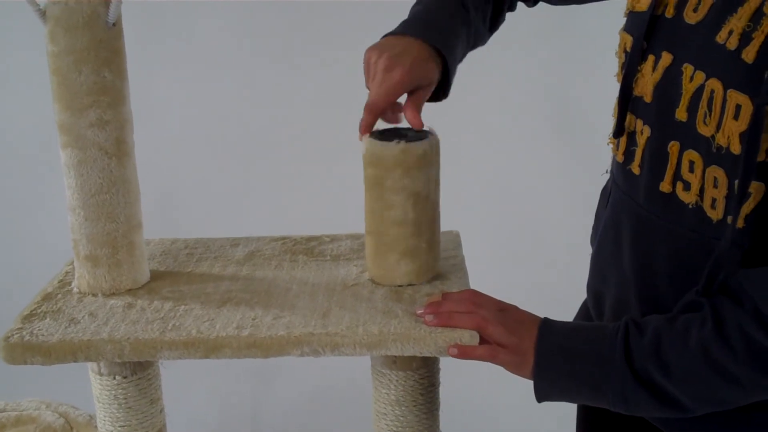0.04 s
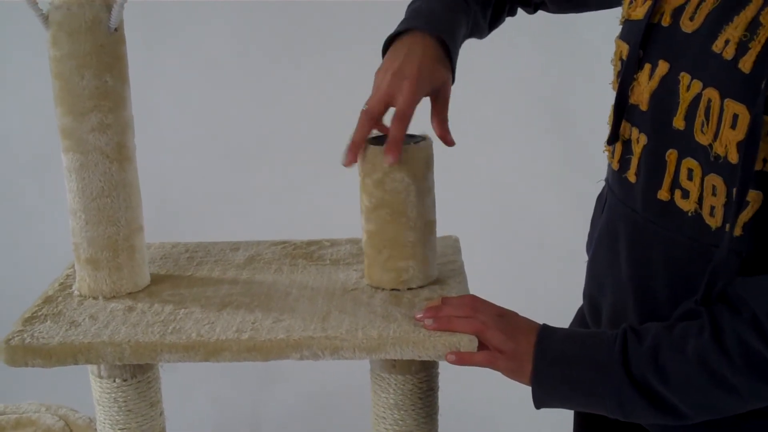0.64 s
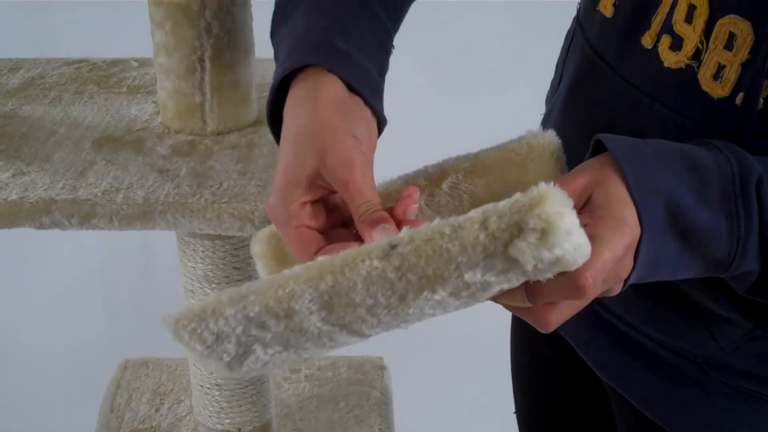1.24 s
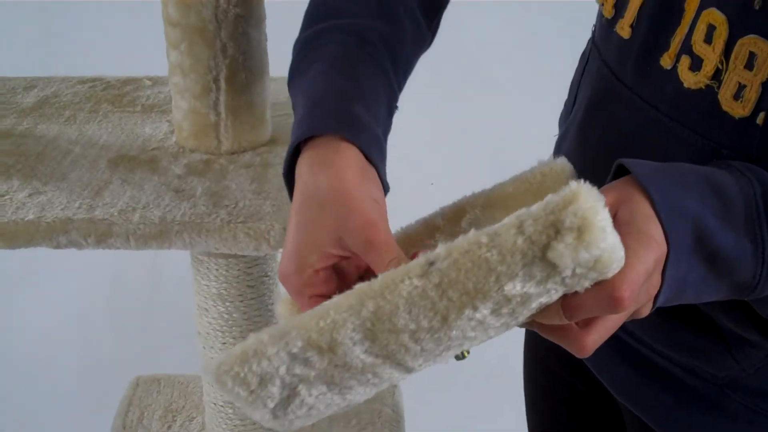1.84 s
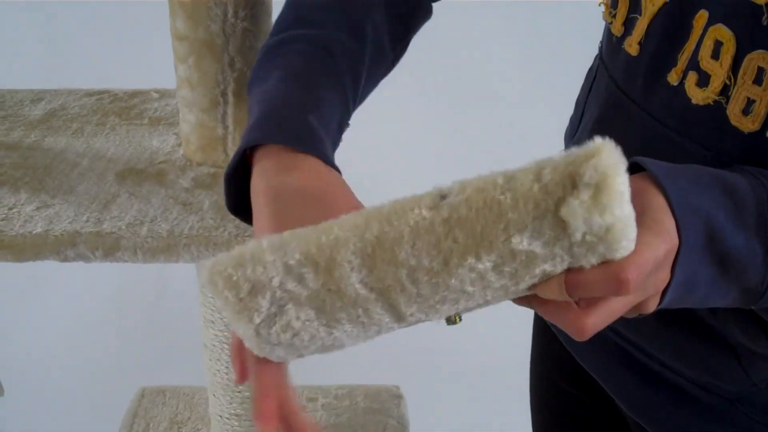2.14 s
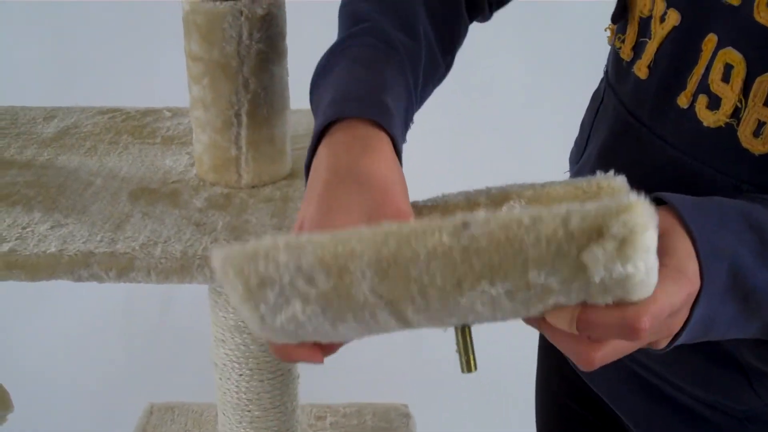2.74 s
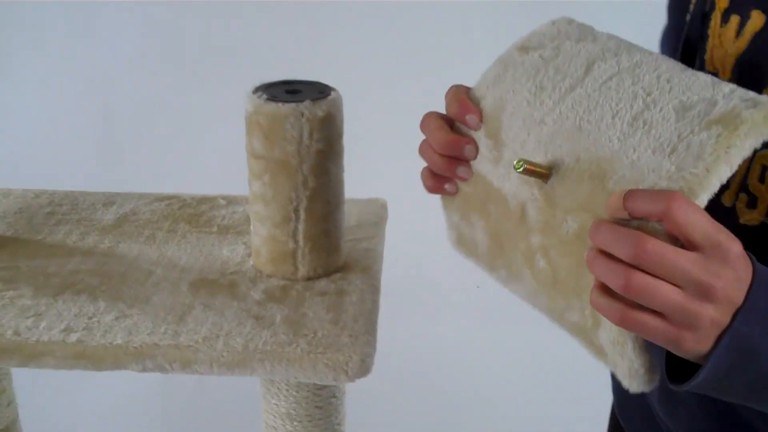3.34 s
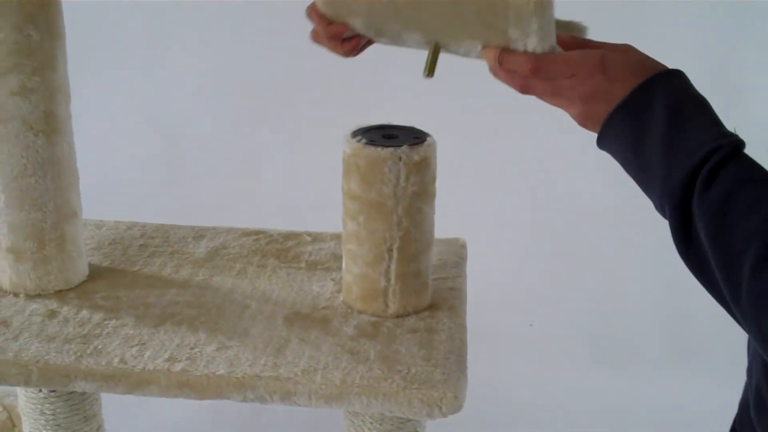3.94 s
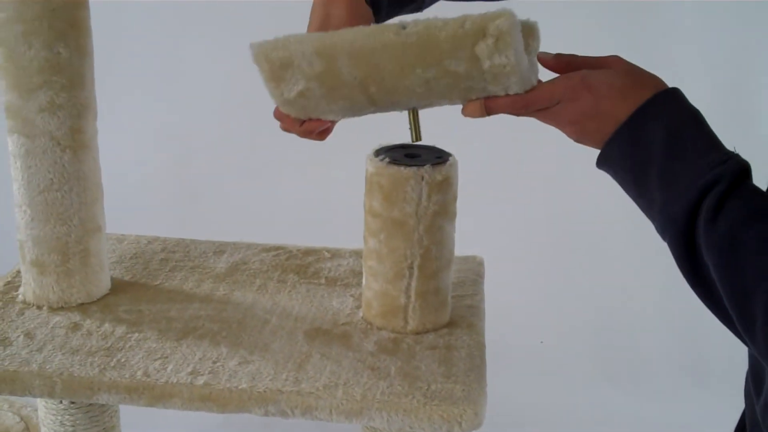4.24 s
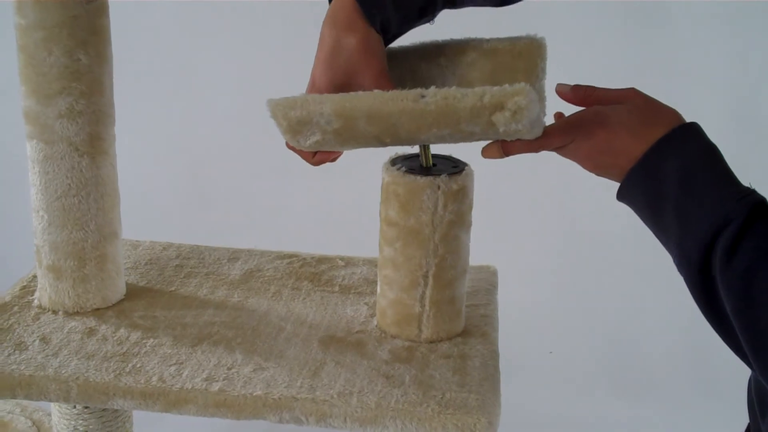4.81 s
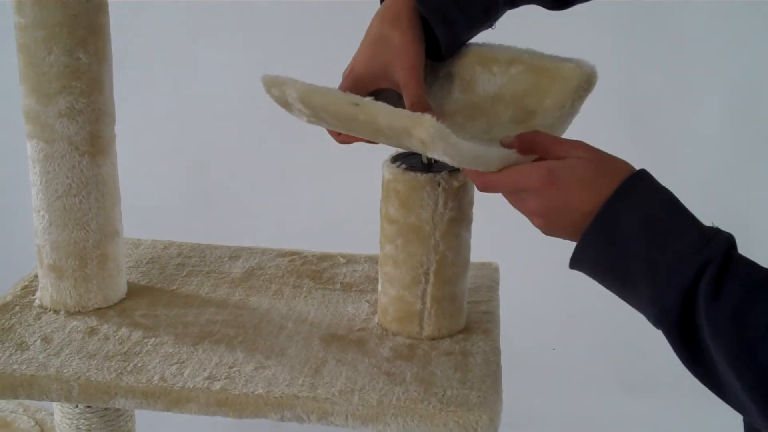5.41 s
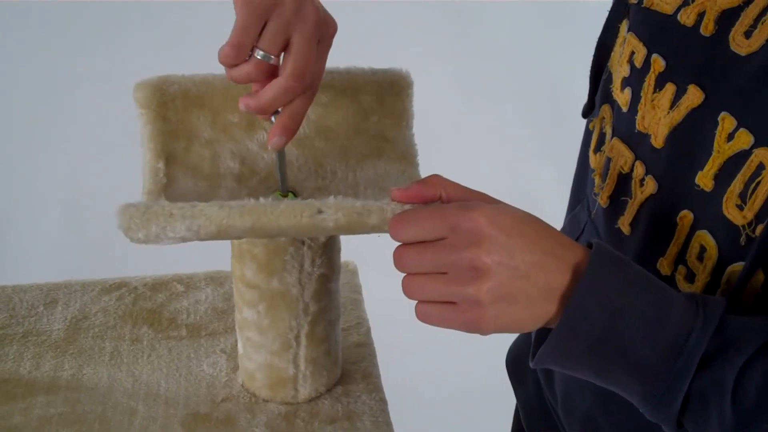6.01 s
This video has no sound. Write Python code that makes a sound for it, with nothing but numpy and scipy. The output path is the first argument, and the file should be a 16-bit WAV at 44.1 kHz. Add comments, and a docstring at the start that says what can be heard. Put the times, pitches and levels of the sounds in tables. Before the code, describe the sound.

Close to a hissy microphone in a bare, slightly echoing room, someone assembles a cat tree. Dull rubbing and small bumps come first as a post turns. Faint ticks and short scrapes of a bolt's thread lead to the loudest sound, a quick rasp and thump as it goes home. Faint rustling follows, then a cluster of light knocks as the perch seats, and one crisp metal tap.

```python
"""Assembling a carpeted cat tree.

A bare room, with the work close to a hissy camera microphone. A post is twisted tight on its platform,
rubbing and knocking. After a brief dropout a steel bolt is pushed through a perch board, its thread
rasping in the hole until the head thumps home. The bolt bumps over the post's cap and slides in,
the perch drops into place, and a steel key knocks on the bolt's head."""
import sys
import numpy as np
from scipy import signal
from scipy.fft import rfft, irfft
from scipy.io import wavfile
from scipy.ndimage import uniform_filter1d

SR = 44100
rng = np.random.default_rng(int(sys.argv[2]) if len(sys.argv) > 2 else 0)


def persist_wave(psi):
    """Save psi, clipped to +-1, as 16-bit WAV."""
    counts = np.round(np.clip(psi, -1, 1) * 32767).astype(np.int16)
    wavfile.write(sys.argv[1], SR, np.atleast_2d(counts).T)


N = 267588
TIME = np.arange(N) / SR
DROPOUT_START_S, DROPOUT_END_S = 0.692, 0.715

# Resonances of the post and of the seated perch. Each row: frequency in Hz, level in dB, t60 in seconds.
POST_MODES = [(145, -19, 0.15), (207, -7.5, 0.11), (303, -1, 0.04), (394, -1.5, 0.054), (499, -2, 0.065),
              (596, -1.5, 0.07), (680, -2.5, 0.056), (883, -1.5, 0.028), (1183, -3.5, 0.027),
              (1660, -0.5, 0.0094), (2033, 3, 0.024), (2400, -9, 0.015), (3800, 0, 0.011)]
PERCH_MODES = [(366, -6, 0.048), (536, 0.5, 0.049), (687, 4.5, 0.022), (870, 3, 0.019), (1063, -1.5, 0.051),
               (1195, 5, 0.013), (1434, 2.5, 0.015), (1670, -1.5, 0.022), (1970, 2.5, 0.018),
               (2135, 0, 0.021), (2465, 0, 0.021), (3240, -5.5, .011), (4040, 2.5, 0.024),
               (4510, -1, 0.027), (5600, -20, 0.0076)]


def gain_of(db):
    """Decibels to amplitude."""
    return 10 ** (np.asarray(db) / 20)


def unit_rms(x):
    """Scales to rms 1."""
    return x / np.sqrt(np.mean(x ** 2) + 1e-20)


def curve_at(points, hz):
    """Reads a table on a log-frequency axis."""
    point_hz, value = np.transpose(points)
    return np.interp(np.log(hz + 1), np.log(point_hz + 1), value)


def add(mix, start_s, sound):
    """Mixes a sound in at its start time."""
    part = mix[max(round(start_s * SR), 0):][:len(sound)]
    part += sound[:len(part)]


def coloured(x, spectrum, share=1):
    """Filters by a table of dB, or by a share of it."""
    size = x.shape[-1]
    gain = gain_of(share * curve_at(spectrum, np.fft.rfftfreq(size, 1 / SR)))
    return irfft(rfft(x) * gain, size)


def peaked(x, peaks):
    """Lifts a few broad resonances."""
    hz = np.fft.rfftfreq(len(x), 1 / SR)
    lift_db = sum(db * np.exp(-((hz - centre) / width) ** 2) for centre, width, db in peaks)
    return irfft(rfft(x) * gain_of(lift_db), len(x))


def leaned_left(pair, balance):
    """Raises the left channel and lowers the right, each by a share of the balance curve."""
    return np.array([coloured(pair[0], balance, 0.71), coloured(pair[1], balance, -0.58)])


def stereo_noise(size, likeness):
    """White noise whose two channels are partly alike, band by band."""
    same = np.clip(curve_at(likeness, np.fft.rfftfreq(size, 1 / SR)), -1, 1)
    left, independent = rfft(rng.standard_normal((2, size)))
    right = same * left + np.sqrt(1 - same ** 2) * independent
    return irfft(np.array([left, right]), size)


def ring(modes, size):
    """Damped modes; neighbours swing in opposite directions."""
    t = np.arange(size) / SR
    return sum((-1) ** k * gain_of(db) * np.exp(-np.log(1000) * t / t60) * np.sin(2 * np.pi * hz * t)
               for k, (hz, db, t60) in enumerate(modes))


def efforts(rows, attack_s, fade_db_per_s, release_s):
    """Each movement takes hold, fades or swells steadily while it lasts, and lets go."""
    out = np.zeros(N)
    for start, length, db in rows:
        t = np.maximum(TIME - start, 0)
        attack = np.minimum(t / attack_s, 1)
        hold = gain_of(db - fade_db_per_s * np.minimum(t, length))
        release = np.exp(-np.maximum(t - length, 0) / release_s)
        out += attack * hold * release
    return out


def swells(rows):
    """Short movements that swell and fade evenly."""
    power = np.zeros(N)
    for middle_s, db, half_s in rows:
        near = abs(TIME - middle_s) < 4 * half_s
        power[near] += gain_of(db) ** 2 * np.exp(-((TIME[near] - middle_s) / half_s) ** 2)
    return np.sqrt(power)


def grains(per_s, spread_db):
    """Tiny stick-slip clicks of uneven size."""
    size = gain_of(spread_db * np.minimum(rng.exponential(1, N), 4))
    return unit_rms(rng.standard_normal(N) * size * (rng.random(N) < per_s / SR))


def scratching(effort, spectrum, per_s, spread_db):
    """Dense scratching that follows the effort."""
    return unit_rms(coloured(grains(per_s, spread_db), spectrum)) * effort


def friction(effort, modes, per_s, spread_db, soft_hz):
    """Small slips ring the board, softened by its carpet."""
    body = signal.oaconvolve(grains(per_s, spread_db), ring(modes, size=SR // 5))[:N]
    body = signal.sosfilt(signal.butter(1, soft_hz, fs=SR, output="sos"), body)
    return unit_rms(body) * effort


def tick_and_thud(rows, lag_s, tick_span, thud_band_hz):
    """A knock is two contacts: a hard edge ticks, then the padded weight lands with a dull thud."""
    ticks = [(s, tick_db, top_hz / tick_span, top_hz) for s, tick_db, _, top_hz in rows]
    thuds = [(s + lag_s, thud_db, *thud_band_hz) for s, _, thud_db, _ in rows]
    return ticks + thuds


def knocks(rows, modes, crunch_db, crunch_s):
    """Each contact rings the board, with a brief crunch of fibres; its place and hardness set the band."""
    out, t = np.zeros(N), np.arange(SR // 5) / SR
    body = ring(modes, size=len(t))
    for start_s, db, low_hz, high_hz in rows:
        crunch = gain_of(crunch_db) * rng.standard_normal(len(t)) * np.exp(-t / crunch_s)
        blow = signal.sosfilt(signal.butter(2, low_hz, "high", fs=SR, output="sos"), body + crunch)
        blow = signal.sosfilt(signal.butter(3, high_hz, fs=SR, output="sos"), blow)
        rms_as_10_ms = np.sqrt(np.sum(blow ** 2) / (SR / 100))
        add(out, start_s, gain_of(db) * blow / rms_as_10_ms)
    return out


def microphone_hiss():
    """Steady microphone noise with a thin, wavering whine."""
    # Each row: frequency in Hz, then relative level in dB, leftward lean in dB or left-right likeness.
    spectrum = [(5, -60), (25, -9.5), (50, -12), (160, -14), (400, -15), (1500, -17), (3500, -17.5),
                (5100, -18.5), (7000, -23), (10000, -29), (12400, -36), (14000, -41.5), (15000, -54)]
    balance = [(50, 3), (500, 3.5), (3000, 2.5), (13000, 2)]
    likeness = [(50, 0.44), (200, 0.092), (600, 0.31), (2000, 0.051)]
    whine_hz, waver_hz = 7860, 30
    noise = unit_rms(coloured(stereo_noise(N, likeness), spectrum))
    waver = unit_rms(uniform_filter1d(rng.standard_normal((2, N)), size=300, axis=1))
    whine = unit_rms(np.sin(2 * np.pi * np.cumsum(whine_hz + waver_hz * waver, axis=1) / SR))
    return leaned_left(gain_of(-55) * noise + gain_of(-75) * whine, balance)


def room(x, wet_db, echo_db, modes_db):
    """The bare room: direct sound, near echoes, standing waves and a tail that dies faster in the treble."""
    # The tail. Each row: frequency in Hz, then t60 in seconds, gain in dB or left-right likeness.
    decay = [(100, 0.75), (300, 0.75), (1000, 0.96), (2500, 0.8), (5000, 0.74), (11000, 0.34)]
    colour = [(100, -1), (215, 0), (290, 2.5), (800, 2), (1500, -1), (3000, -4.5), (6000, -10), (12000, -8)]
    likeness = [(400, 0.91), (1100, 1), (3000, 0.3), (6000, .02)]
    # Each row: frequency in Hz, relative level in dB, t60 in seconds.
    standing_waves = [(279, -42.5, 0.82), (306, -52, 0.55), (362, -63, 0.45), (393, -59, .65),
                      (536, -45, 0.9)]
    # Off the platform and walls. Each row: delay in seconds, relative level in dB.
    echoes = [(.0021, -16), (.0061, -19), (.0098, -9), (0.0163, -16)]
    hz, t, bands = signal.stft(stereo_noise(SR, likeness), SR, nperseg=256)
    bands = bands * np.exp(-np.log(1000) * t / curve_at(decay, hz)[:, None])
    tail = signal.istft(bands, SR, nperseg=256)[1][:, :SR]
    tail = coloured(tail / np.linalg.norm(tail[0]), colour)
    build_up = np.clip((TIME[:SR] - 0.003) / 0.0088, 0, 1)
    response = build_up * (gain_of(wet_db) * tail + gain_of(modes_db) * ring(standing_waves, size=SR))
    response[:, 0] += 1  # the direct path to the microphone
    for delay_s, db in echoes:
        response[:, round(delay_s * SR)] += gain_of(db + echo_db)
    return signal.fftconvolve(x[None], response, axes=1)[:, :N]


def tick_and_rustle():
    """A small dull tick of the bolt, and hands and sleeves brushing the plush and gripping the post."""
    # The bolt's tick comes first. Each row: middle in seconds, relative level in dB, half length in seconds.
    tick_and_brushes = [(1.4448, -41.5, .001), (1.845, -51, 0.0077), (2.96, -56, 0.054),
                        (3.035, -53.5, .023), (3.6, -58, 0.081), (5.135, -54, 0.0046)]
    # Each row: start and length in seconds, relative level in dB.
    grips = [(0, 0.035, -47), (.21, .13, -52.5), (.44, 0.12, -52)]
    # Each row: frequency in Hz, relative level in dB.
    spectrum = [(150, -38), (500, 4.5), (2000, 14), (4000, 11), (7000, 1), (11000, -2.5), (15000, -38)]
    gripping = efforts(grips, attack_s=0.0027, fade_db_per_s=7, release_s=0.015)
    return scratching(swells(tick_and_brushes) + gripping, spectrum, per_s=9000, spread_db=-3.5)


def perch_jolt():
    """The whole perch jolts in the hands with a low bump as the bolt stops."""
    # Each row: middle in seconds, level in dB, half length in seconds.
    jolts = [(2.386, -49.5, 0.017)]
    # Each row: frequency in Hz, relative level in dB.
    spectrum = [(20, -13), (45, -6), (80, 0), (120, 3), (200, -9), (500, -36), (2000, -70)]
    return scratching(swells(jolts), spectrum, per_s=SR, spread_db=11.0)


def thread_rasp():
    """The bolt slips through the hole, each slip a quick run of ridges catching inside a softer drag."""
    # Each row: start and length in seconds, relative level in dB.
    slips = [(1.225, 0.0057, -52), (1.383, 0.027, -55.5), (1.6, 0.014, -43), (1.822, .017, -32),
             (2.355, 0.033, -19.5)]
    # Light rubbing between slips. Each row: middle in seconds, relative level in dB, half length in seconds.
    rubs = [(1.745, -60.5, .023), (2.077, -59.5, 0.018), (2.283, -57, 0.067)]
    # Each row: time in seconds, relative level in dB.
    rim_ticks = [(1.381, -47), (1.4524, -46.5), (1.7974, -41.5)]
    # Each row: frequency in Hz, relative level in dB.
    spectrum = [(80, -49), (250, -13), (800, -7), (1300, -9), (2200, -6), (4200, -5.5), (6200, -3.5),
                (7500, -5.5), (9700, -5), (11300, -15), (12400, -22), (13500, -25), (15000, -50)]
    # Each row: centre and half width in Hz, lift in dB.
    resonances = [(1810, 130, 6), (2850, 190, 7), (3750, 220, 5.5), (4800, 180, 7), (5760, 230, 2.5)]
    ridge_gap_s, build_share = 0.00907, 0.21
    ridge_half_s, drag_half_s, tick_half_s = 0.0028, 0.012, 0.00056
    catches = []
    for start, length, db in slips:
        drag_db = -33 + 0.39 * db
        catches.append((start + length / 2, drag_db, drag_half_s))
        for t in np.arange(ridge_gap_s / 2, length, ridge_gap_s):
            force = min(t / (build_share * length), 1)
            catches.append((start + t, db + 20 * np.log10(force), ridge_half_s))
    ticks = [(s, db, tick_half_s) for s, db in rim_ticks]
    rasp = scratching(swells(catches + rubs + ticks), spectrum, per_s=SR, spread_db=0.0)
    return peaked(rasp, resonances)


def handling():
    """Rasp, ticks, rustle and jolt reach the microphone through the same room."""
    close_sounds = gain_of(-1.5) * thread_rasp() + gain_of(-3.3) * tick_and_rustle() + perch_jolt()
    return room(close_sounds, wet_db=-8.5, echo_db=-11.0, modes_db=-27)


def post_twisting():
    """A few steps from the microphone, the post rubs and rocks on a platform that shudders as it tightens."""
    # Each row: start and length in seconds, relative level in dB.
    twists = [(0, 0.055, -41), (.195, .14, -41.5), (.385, 0.23, -42)]
    shudders = [(.437, 0.2, -39)]
    # Each row: frequency in Hz, level in dB, t60 in seconds.
    platform_modes = [(194, 0, 0.15), (251, 5, 0.099)]
    # Each row: time in seconds, relative tick and thud levels in dB, top of the tick in Hz.
    rocking = [(.0515, -40, -66, 3360), (.1775, -58, -50, 1500), (.1972, -43, -28.5, 4000),
               (.2495, -67, -41, 2000), (.3265, -45, -35.5, 2200), (.3805, -63, -34.5, 2040),
               (.4085, -68, -52, 2000), (.4352, -33.5, -34.5, 2670), (.4625, -42, -36, 2000),
               (.4892, -49, -51, 2400), (.5492, -42.5, -38.5, 2640), (.6821, -36, -33, 3900)]
    turning = efforts(twists, attack_s=0.005, fade_db_per_s=34, release_s=0.04)
    rub = friction(turning, POST_MODES, per_s=1200, spread_db=2.0, soft_hz=1450)
    tightening = efforts(shudders, attack_s=0.016, fade_db_per_s=75, release_s=0.02)
    groan = friction(tightening, platform_modes, per_s=3400, spread_db=-2.5, soft_hz=600)
    contacts = tick_and_thud(rocking, lag_s=0.00193, tick_span=4.5, thud_band_hz=(313, 850))
    bumps = knocks(contacts, POST_MODES, crunch_db=8.5, crunch_s=0.0051)
    post = gain_of(-4.0) * rub + gain_of(-6.0) * groan + gain_of(-4.5) * bumps
    return room(post, wet_db=-6.5, echo_db=-4.5, modes_db=-45)


def perch_seating():
    """The bolt's tip hunts over the plastic cap and drops into the post, and the perch lands on it."""
    # Each row: start and length in seconds, relative level in dB.
    scrapes = [(4.765, 0.12, -54), (4.884, 0.05, -40)]
    # Each row: frequency in Hz, level in dB, t60 in seconds.
    cap_modes = [(2610, -5.5, 0.048), (3440, -2, .03), (4640, -4, 0.017)]
    # Each row: time in seconds, relative tick and thud levels in dB, top of the tick in Hz.
    bolt_knocks = [(4.7014, -36.5, -42.5, 1700), (4.8897, -33, -41, 3860), (4.9073, -31.5, -36, 2730),
                   (4.9233, -30.5, -36.5, 3680), (4.9293, -33.5, -46, 3400)]
    # Each row: time in seconds, relative level in dB, low and high band edges in Hz.
    weight_on_post = [(4.916, -46.5, 110, 240)]
    sliding = efforts(scrapes, attack_s=0.014, fade_db_per_s=7, release_s=0.011)
    scrape = friction(sliding, PERCH_MODES + cap_modes, per_s=2000, spread_db=-3.0, soft_hz=700)
    contacts = tick_and_thud(bolt_knocks, lag_s=0.006, tick_span=3.0, thud_band_hz=(486, 1050))
    bumps = knocks(contacts, PERCH_MODES + cap_modes, crunch_db=9.0, crunch_s=0.0059)
    # The tip skips dully over the cap at an even pace, 1 dB stronger each time.
    chatter = [(4.7945 + 0.029 * k, -41.5 + k, 520, 620) for k in range(3)]
    skips = knocks(chatter, PERCH_MODES, crunch_db=-3.0, crunch_s=0.006)
    landing = knocks(weight_on_post, POST_MODES, crunch_db=5.0, crunch_s=0.012)
    perch = gain_of(-2.0) * scrape + gain_of(-2.5) * (bumps + skips + landing)
    return room(perch, wet_db=-6.5, echo_db=-4.5, modes_db=-40.0)


def key_knock():
    """The steel key knocks on the bolt's head: a short bright ping over the ring of the seated perch."""
    # One row: time in seconds, relative tick and thud levels in dB, top of the tick in Hz.
    strike = [(5.6429, -25.5, -29.5, 4100)]
    # Each row: frequency in Hz, relative level in dB, t60 in seconds.
    key_modes = [(5540, -36, 0.019), (6700, -53, 0.011), (9800, -41, 0.028)]
    contacts = tick_and_thud(strike, lag_s=0.00576, tick_span=5.5, thud_band_hz=(450, 1000))
    knock = knocks(contacts, PERCH_MODES, crunch_db=5.0, crunch_s=0.0043)
    add(knock, start_s=strike[0][0], sound=ring(key_modes, size=SR // 10))
    return room(gain_of(-4.0) * knock, wet_db=-8.0, echo_db=-11.0, modes_db=-40.0)


def bolt_thump():
    """The thread shakes the hand-held board, then the bolt's head hits it and it booms into the room."""
    # One row: start and length in seconds, relative level in dB.
    push = [(2.354, 0.037, -39.5)]
    # Each row: frequency in Hz, level in dB, t60 in seconds.
    board_modes = [(296, -5, 0.054), (405, 1.5, 0.048), (559, 2, 0.021), (723, 0.5, 0.015),
                   (849, -5, 0.027), (1160, -7, 0.02), (1850, -10.5, 0.034)]
    # Each row: time in seconds, relative level in dB, low and high band edges in Hz.
    head_blows = [(2.3892, -17.5, 264, 1050), (2.3982, -22, 396, 850)]
    pushing = efforts(push, attack_s=0.0045, fade_db_per_s=-340, release_s=0.0014)  # swells fast
    drag = friction(pushing, board_modes, per_s=6300, spread_db=-4.5, soft_hz=3000)
    blows = knocks(head_blows, board_modes, crunch_db=-0.5, crunch_s=0.0062)
    return room(gain_of(-5.0) * blows + gain_of(-3.0) * drag, wet_db=-7.0, echo_db=-24, modes_db=-20.0)


def scene():
    """Left of the microphone, work on the post stops dead at the dropout; work on the perch follows."""
    # Each row: frequency in Hz, leftward lean in dB.
    balance = [(100, 4), (3500, 4.5), (6500, 4), (9000, 1), (11000, 3), (13000, 7)]
    post = post_twisting() * (TIME < DROPOUT_START_S)
    work = post + handling() + bolt_thump() + perch_seating() + key_knock()
    return leaned_left(work, balance) + microphone_hiss()


def record(dry):
    """All sound drops out briefly, and the highest treble is cut off."""
    running = (TIME < DROPOUT_START_S) | (TIME > DROPOUT_END_S)
    low_pass = signal.firwin(301, cutoff=14400, window=("kaiser", 8), fs=SR)
    return signal.oaconvolve(dry * running, low_pass[None], "same")


dry = scene()
out = record(dry)
persist_wave(out)
```